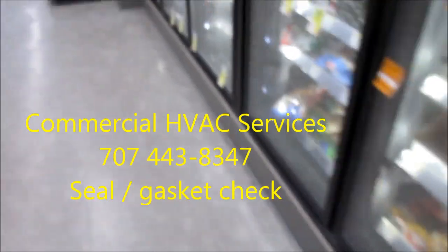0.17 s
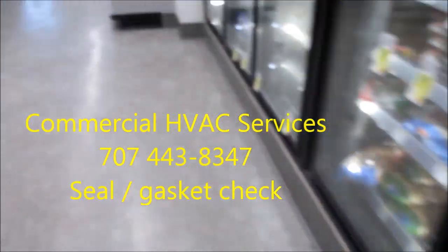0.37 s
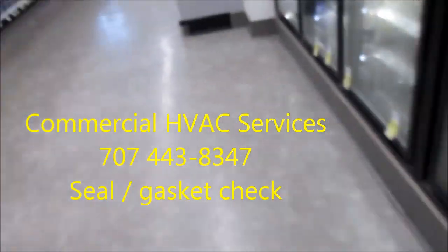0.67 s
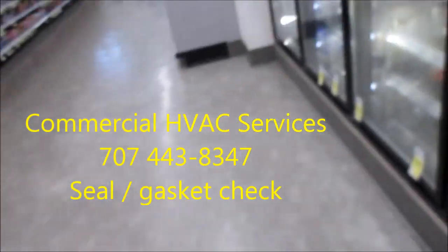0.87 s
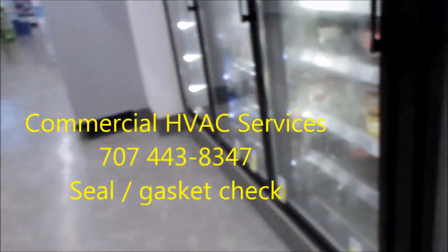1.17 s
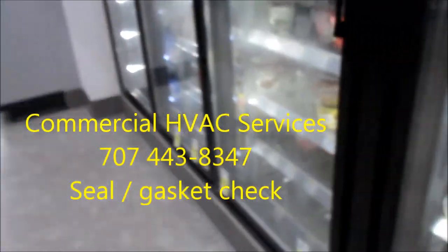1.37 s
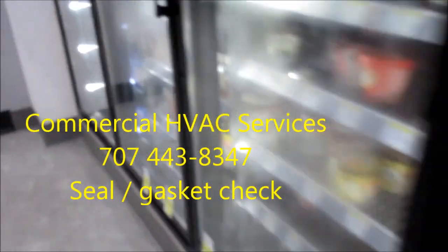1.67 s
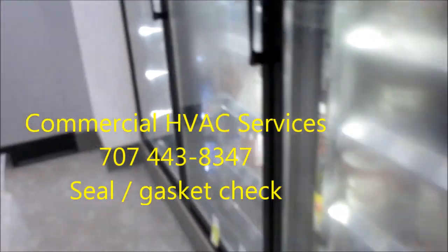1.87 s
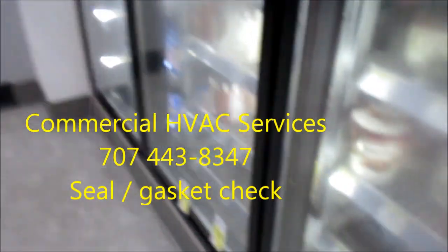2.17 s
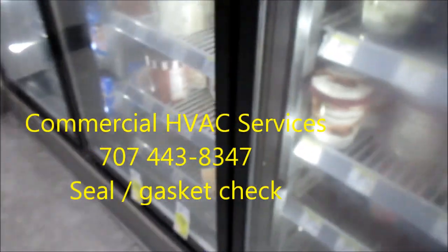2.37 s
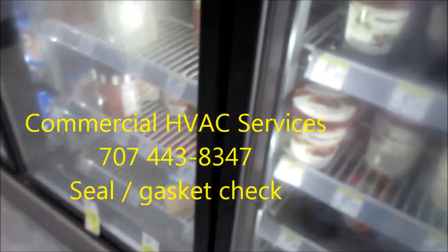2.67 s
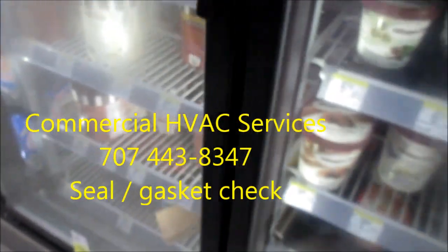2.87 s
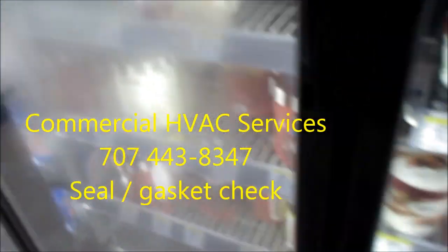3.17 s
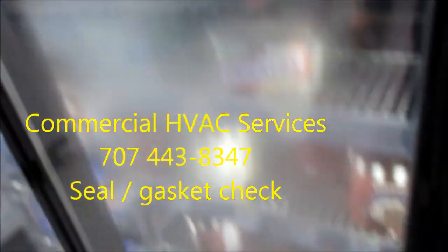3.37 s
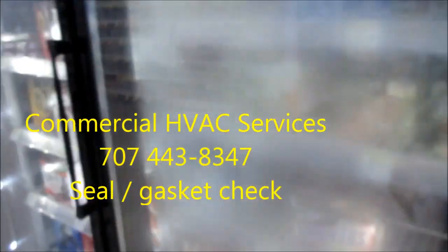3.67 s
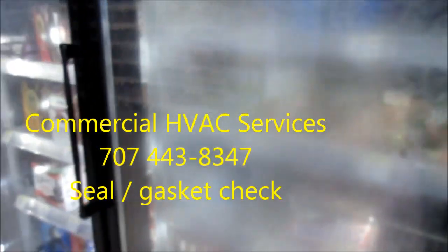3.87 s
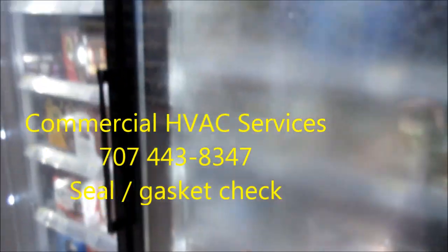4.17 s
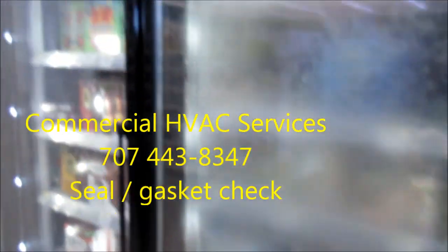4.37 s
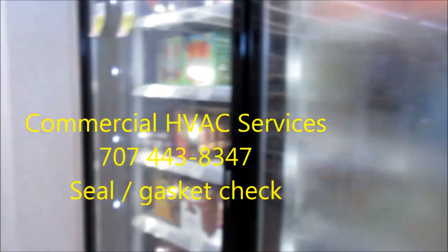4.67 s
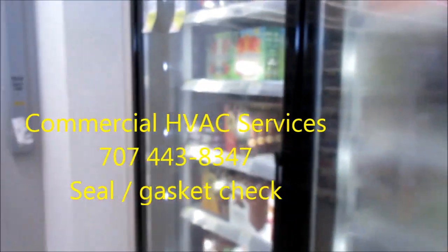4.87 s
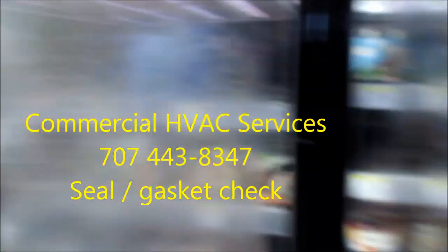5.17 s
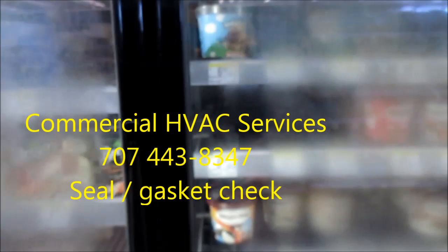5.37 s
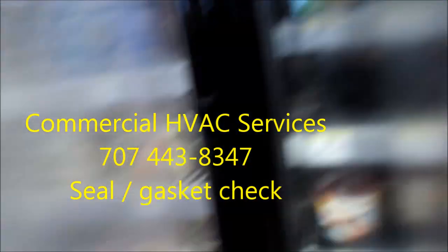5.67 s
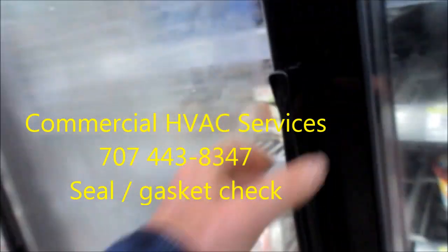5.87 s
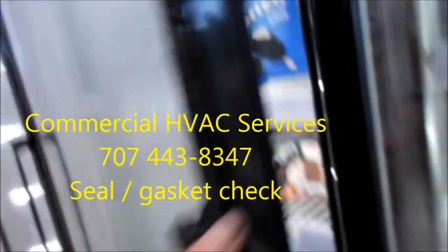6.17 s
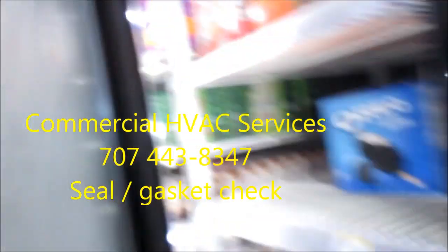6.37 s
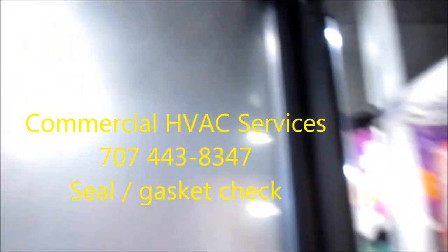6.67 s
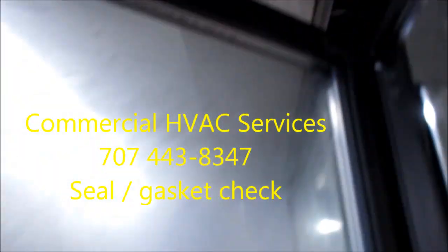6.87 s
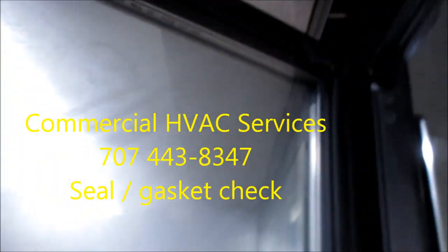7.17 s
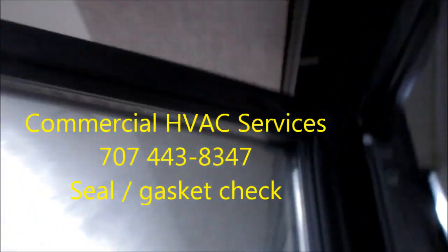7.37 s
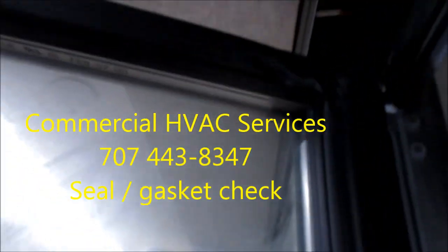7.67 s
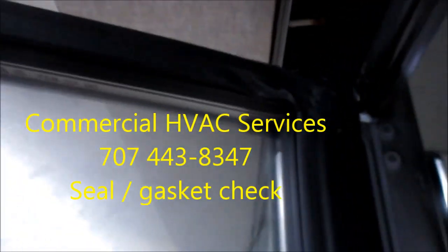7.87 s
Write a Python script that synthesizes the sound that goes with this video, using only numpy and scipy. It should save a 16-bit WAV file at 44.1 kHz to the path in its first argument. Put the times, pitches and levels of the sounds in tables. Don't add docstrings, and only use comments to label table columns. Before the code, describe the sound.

Silence for the first 0.24 s, then the shop background starts abruptly: distant low rumble, airy duct noise, thin cloth hiss and a low compressor hum, with fan tones near 130 Hz dipping as door frames pass. Handling noise sits very close: soft sleeve rubs from 0.3 s, a tap at 0.7, then a dense run of ticks, finger slips and hollow plastic knocks from 1.16 to 1.7 s, the hardest at 1.4. More knocks come at 2.0 to 2.3, a bright cloth swipe with taps around 2.6, and taps at 3.05 and 3.26. From 3.4 to 5.5 s it is mostly wavering hum and duct air, with faint taps. Taps return at 5.6, sharp ticks at 6.05. At 6.12 s a deep air puff marks the door opening; by 6.3 s loud fans and roaring air take over, beating several times a second until about 8 s, with a weak air nudge at 7.9.

```python
import sys
import numpy as np
from scipy import signal
from scipy.fft import rfft, irfft, next_fast_len
from scipy.io import wavfile
from scipy.ndimage import uniform_filter1d, map_coordinates

SR = 44100
rng = np.random.default_rng(int(sys.argv[2]) if len(sys.argv) > 2 else 0)


def transcribe(u):
    v = np.clip(np.atleast_2d(u).T, -1, 1)
    q = np.round(v * 32767).astype(np.int16)
    wavfile.write(sys.argv[1], SR, q)


def voltage_ratio(level):
    return 10 ** (np.asarray(level, float) / 20)


N = 354123


def unit(x):
    return x / np.sqrt(np.mean(x ** 2) + 1e-20)


def along(points, hz):
    point_hz, values = np.transpose(points)
    return np.interp(np.log(hz + 1), np.log(point_hz + 1), values)


def curves(rows, before=None, after=None):
    times, *columns = np.transpose(rows)
    return [np.interp(np.arange(N) / SR, times, column, before, after) for column in columns]


def wobble(rate):
    knots = rng.standard_normal(int(N * rate / SR) + 4)
    return map_coordinates(knots, [np.arange(N) * rate / SR])


def ramp(start, lasts):
    return np.clip((np.arange(N) / SR - start) / lasts, 0, 1)


def bump(center, half_width):
    return np.exp(-((np.arange(N) / SR - center) / half_width) ** 2)


def filtered(x, response):
    m = next_fast_len(len(x) + 8192)
    return irfft(rfft(x, m) * response(np.fft.rfftfreq(m, 1 / SR)), m)[:len(x)]


def lift(resonances, f):
    return voltage_ratio(sum(db / (1 + (2 * (f - hz) / width) ** 2) for hz, width, db in resonances))


def rush(spectrum, patchy_db, resonances=()):
    z = signal.stft(rng.standard_normal(N), nperseg=512)[2]
    field = uniform_filter1d(rng.standard_normal(z.shape), size=6, axis=0)
    field = uniform_filter1d(field, size=12, axis=1)
    noise = signal.istft(z * voltage_ratio(patchy_db * unit(field)), nperseg=512)[1][:N]
    return unit(filtered(noise, lambda f: voltage_ratio(along(spectrum, f)) * lift(resonances, f)))


# time_s, rumble_db
PLANT_LEVEL = [(.3, -34), (1.23, -29.5), (1.61, -37), (2.23, -34), (2.5, -40), (2.88, -34.5), (4.14, -31.5),
               (4.97, -40), (5.2, -33), (5.6, -30), (6.3, -36), (6.55, -41), (7.11, -42), (7.54, -33),
               (8.03, -38)]
# time_s, level_db
DUCT_NEARNESS = [(.3, -2), (.8, -0.5), (1.3, -1.5), (1.77, -3.5), (2.2, -0.5), (3.0, 0), (3.25, -0.5),
                 (3.63, 0.5), (3.9, 0), (4.45, -1), (5.3, -.5), (5.45, -1), (5.95, -0.5), (6.05, 4)]
# time_s, level_db
CLOTH_MOTION = [(.3, 1), (.9, 3), (1.1, 1), (1.55, -1.5), (1.72, 2), (2.3, 2), (2.47, -0.5), (3.3, 1),
                (4.1, -1.5), (4.85, 2.5), (5.25, 1), (5.4, -3.5), (5.68, 1), (5.9, -2)]
# pitch_hz, density_db (per Hz)
RUMBLE_SPECTRUM = [(8.8, -41), (15, -8), (38, 4), (63, 0.5), (76, -2), (92, -16), (104, 7), (110, -7),
                   (140, -53), (240, -120)]
DUCT_SPECTRUM = [(47, -47), (80, -13), (92, -3.5), (108, -8), (130, -3), (156, -9.5), (208, -6.5),
                 (257, -8), (387, -10.5), (418, -14), (689, -22), (1410, -25), (1560, -29), (1760, -35.5),
                 (3000, -49), (3900, -64), (6600, -120)]
HISS_SPECTRUM = [(1060, -23), (1800, -2.5), (2040, -6), (2530, -6), (2790, -6), (4240, -11.5),
                 (9640, -19.5), (14700, -33), (15200, -30)]
# pitch_hz, width_hz, boost_db
AISLE_MODES = [(29, 2.8, 2), (68.3, 3.7, 14), (171, 8.9, 5), (196, 47, -4.5), (289.3, 25, 3),
               (383.5, 11, 4), (697, 113, 4.5), (1170, 113, 3.5), (1584, 74, 9)]


def shop():
    rumble_db, = curves(PLANT_LEVEL)
    near_db, = curves(DUCT_NEARNESS)
    brisk_db, = curves(CLOTH_MOTION)
    rumble = voltage_ratio(rumble_db + 1.15 * wobble(11)) * rush(RUMBLE_SPECTRUM, 0.29, AISLE_MODES)
    duct = voltage_ratio(-28.5 + near_db + 1.1 * wobble(8)) * rush(DUCT_SPECTRUM, 1.13, AISLE_MODES)
    hiss = voltage_ratio(-50 + brisk_db + 0.7 * wobble(15)) * rush(HISS_SPECTRUM, 1.7)
    return rumble + duct + hiss


HUM_PITCHES = (28.7, 59.2)
# time_s, shaft_db, mains_db
HUM_LEVELS = [(.4, -51, -35.5), (1.4, -51, -33), (1.7, -38, -40), (2.3, -35, -30), (2.56, -42, -37),
              (2.8, -33, -29.5), (3.3, -33, -33), (3.7, -42, -33), (4.33, -33, -42), (5.1, -35, -32),
              (5.4, -33, -40), (6.2, -38, -36)]
# pitch_hz, first_db, last_db
CLOSED_FANS = [
    (131.7, -34.5, -49),
    (126.9, -34, -28.5),
]
# center_s, half_width_s, level_db
FRAME_SHADOWS = [(.63, 0.15, -12), (1.2, 0.056, -22), (1.56, 0.044, -15), (2.52, 0.023, -14),
                 (2.66, .1, -4.5), (3.32, 0.03, -14), (4.32, 0.042, -16), (4.6, 0.24, -5.5),
                 (5.04, 0.04, -2), (5.8, 0.052, -1.5)]


def compressors():
    t = np.arange(N) / SR

    def tone(hz, db, drift):
        level = voltage_ratio(db + 0.87 * wobble(11))
        return level * np.sqrt(2) * np.sin(2 * np.pi * hz * t + drift * wobble(7))

    levels = curves(HUM_LEVELS, after=-60)
    hum = sum(tone(hz, db, 0.009 * hz) for hz, db in zip(HUM_PITCHES, levels))
    shade_db = sum(db * bump(center, half_width) for center, half_width, db in FRAME_SHADOWS)
    shade_db = shade_db - 40 * ramp(6.15, 0.1)
    passed = ramp(2.3, 1.1)
    fans = sum(tone(hz, first_db + (last_db - first_db) * passed + shade_db, 0.87)
               for hz, first_db, last_db in CLOSED_FANS)
    return hum + fans


# pitch_hz, width_hz, boost_db
DUCT_MODES = [(240, 14, 17.5), (258.1, 17, 27), (296, 22, 25)]


def grilles():
    near_db, = curves(DUCT_NEARNESS[:-1], after=-20)
    level = voltage_ratio(-38 + 2.2 * near_db + 5.8 * ramp(1.8, 1.4) + wobble(6))
    return level * rush([(150, -40), (230, -3.5), (310, -0.5), (450, -42)], 0.6, DUCT_MODES)


# start_s, length_s, level_db, pitch_hz
CLOTH_RUBS = [(.269, 0.13, -46, 3980), (0.538, 0.049, -46.5, 5000), (0.578, 0.048, -39.5, 6200),
              (0.916, 0.031, -42.5, 6400), (1.0, 0.035, -56, 5000), (1.803, 0.058, -48, 5000),
              (1.87, 0.029, -45, 3000), (1.913, .012, -50, 4600), (1.958, .031, -44.5, 6960),
              (2.011, 0.046, -41.5, 7500), (2.575, 0.035, -47, 6000), (2.615, 0.048, -30, 4070),
              (2.668, 0.057, -37.5, 5000), (2.735, 0.054, -43.5, 5460), (3.22, .05, -52, 5000),
              (3.296, 0.018, -47, 7000), (3.38, 0.058, -43.5, 5600), (3.659, .033, -51, 5000),
              (5.119, .04, -49, 4500), (5.532, 0.11, -49, 6000), (5.767, 0.043, -51.5, 6000)]
# start_s, length_s, level_db, pitch_hz, body_db (below 3 kHz)
FINGER_SLIPS = [(0.713, 0.039, -38.5, 9000, 0), (1.19, 0.023, -43, 6000, 9),
                (1.297, 0.053, -40.5, 9000, -1), (1.329, 0.014, -34.5, 8650, 7),
                (1.401, 0.022, -31, 6160, 10), (1.473, 0.016, -36, 6000, 10.5),
                (1.532, 0.011, -36.5, 6050, 5), (1.647, 0.024, -37, 6030, 5), (3.031, 0.021, -35, 10500, 1),
                (3.047, 0.021, -39.5, 7000, 2), (5.607, 0.034, -42.5, 12500, 9),
                (6.035, 0.024, -37.5, 8300, 3.5), (6.057, .028, -37.5, 8950, 6),
                (6.109, .017, -39, 5000, -4), (6.33, .02, -36, 6000, -1)]
# pitch_hz, width_hz, boost_db
HOUSING_MODES = [(6200, 430, -2), (8600, 880, 0), (12500, 1400, 3.5), (3320, 690, 6)]


def scuffs():
    out, t = np.zeros(N + SR), np.arange(SR // 5) / SR
    # body_db (rubs only), fall_db, release t60 over the length
    rows = [row + (-1.5, -3, 2) for row in CLOTH_RUBS] + [row + (-6.5, 0.25) for row in FINGER_SLIPS]
    for start, length, db, hz, body_db, fall_db, tail in rows:
        bright_noise, body_noise, grit = rng.standard_normal((3, len(t)))

        def bright_gain(f):
            edges = 1 / (1 + (2600 / (f + 1)) ** 2) / (1 + f / (0.28 * hz)) / (1 + (f / 14000) ** 6)
            return edges * lift(HOUSING_MODES + [(hz, 0.22 * hz, 9)], f)

        def body_gain(f):
            edges = f / (f + 400) / (1 + (f / 2900) ** 12)
            return edges * lift([(2750, 210, 3.5), (1380, 3000, 6.3)], f)

        bright = unit(filtered(bright_noise, bright_gain))
        body = voltage_ratio(body_db) * unit(filtered(body_noise, body_gain))
        struck = min(abs(tick[0] - start) for tick in CLICKS) < 0.004
        rise = np.clip(t / (0.001 if struck else 0.2 * length), 0, 1)
        fade = voltage_ratio(-60 * np.clip(t - length, 0, 1) / (0.012 + tail * length))
        stick_slip = unit(voltage_ratio(1.3 * unit(uniform_filter1d(grit, size=120))))
        level = voltage_ratio(np.interp(t, [0, length], [db, db + fall_db]))
        out[round(start * SR):][:len(t)] += level * rise * fade * stick_slip * (bright + body)
    return out[:N]


# start_s, peak_db, pitch_hz
CLICKS = [(.514, -33, 5690), (.85, -22.5, 4140), (.9138, -33, 3060), (1.164, -22, 4250), (1.295, -23, 4200),
          (1.3514, -34, 6000), (1.403, -27, 3010), (1.4364, -37, 4730), (1.4725, -33, 3450),
          (1.529, -27, 6020), (1.6457, -35, 6080), (1.8108, -35, 3490), (2.0113, -40, 3890),
          (2.2666, -24.5, 3410), (2.524, -29, 7000), (3.265, -23, 3600), (5.6064, -39, 3100),
          (5.6574, -41, 3250), (6.0494, -16, 6960), (6.105, -28, 4140)]


def ticks():
    out, t = np.zeros(N + SR), np.arange(SR // 20) / SR
    for start, db, hz in CLICKS:
        def gain(f):
            bell = 1 / (1 + ((f - hz) / (0.5 * hz)) ** 2)
            return bell + 0.1 * (f > hz) / (1 + (f / 11000) ** 4)

        crack = unit(filtered(rng.standard_normal(len(t)), gain))
        out[round(start * SR):][:len(t)] += voltage_ratio(db - 7.5 - 60 * t / 0.011) * crack
    return out[:N]


# start_s, peak_db, ring_hz, t60_s, shell_db
TAPS = [(0.724, -24, 2120, 0.017, -7), (1.163, -25, 660, 0.013, -1), (1.199, -20, 1220, 0.032, -21),
        (1.296, -19.5, 1000, 0.012, -9), (1.338, -17.5, 900, 0.024, -17), (1.4027, -2.5, 580, 0.012, -7),
        (1.473, -15, 587, 0.012, -20), (1.504, -19, 681, 0.016, -13), (1.529, -15, 624, 0.025, -16),
        (1.646, -18, 650, 0.026, -14), (1.713, -30, 657, 0.013, -7), (2.012, -13, 624, 0.0094, -22),
        (2.197, -18.5, 694, 0.023, -14), (2.266, -18.5, 656, 0.021, -22), (2.611, -20.5, 1130, 0.017, -22),
        (2.671, -15, 1070, 0.023, -9), (3.048, -19, 1485, 0.03, -19), (3.264, -19, 2010, 0.014, -14.5),
        (4.376, -38, 719, 0.0091, -10), (4.762, -26, 696, 0.013, -11), (5.590, -17.5, 1530, 0.018, -20),
        (5.607, -17.5, 800, 0.0084, -8), (6.511, -21, 684, 0.013, -11)]


def knocks():
    out, t = np.zeros(N + SR), np.arange(SR // 20) / SR
    shell_hz = 2440

    def note(hz):
        return np.sin(2 * np.pi * hz * t)

    for start, db, hz, t60, shell_db in TAPS:
        shell = note(shell_hz) - 1.6 * note(0.58 * shell_hz)
        ring = note(hz) + 0.76 * note(0.684 * hz) + voltage_ratio(shell_db) * shell
        noise = rng.standard_normal(len(t))
        crack = unit(filtered(noise, lambda f: f / (f + hz) / (1 + (f / 3000) ** 4)))
        attack_s = 0.003 if t60 > 0.025 else 0.00035
        envelope = voltage_ratio(db - 60 * t / t60) * (1 - np.exp(-t / attack_s))
        out[round(start * SR):][:len(t)] -= envelope * (ring + 0.066 * crack)
    return out[:N]


# time_s, level_db
CASE_NEARNESS = [(6.09, -10), (6.3, 0), (6.47, 0), (6.78, 3), (6.84, -1), (7.05, -0.5), (7.64, 0),
                 (7.76, -2), (8.0, 0)]
FAN_PITCHES = (120.1, 126.7, 133.3)
# facing_shelves_db, bent_down_db
FAN_LEVELS = [(-15.5, -18), (-24.5, -28), (-30, -17)]
# pitch_hz, density_db (per Hz)
STREAM_SPECTRUM = [(29, -56), (50, -40), (70, -19.5), (100, -17.5), (131, -1), (155, -13.5), (183, -12),
                   (311, -12), (425, -15), (1450, -30.5), (7810, -52), (10400, -55), (15700, -66.5)]
# pitch_hz, width_hz, boost_db
CABINET_MODES = [(154, 14, 5), (184, 12, -1), (239, 43, 4), (400, 5.5, 0.5), (918, 100, 4),
                 (2260, 1800, 4.5), (10500, 670, 4)]


def open_case():
    t = np.arange(N) / SR - 7.09
    near_db, = curves(CASE_NEARNESS, before=-60)
    bent = ramp(6.35, 0.45)

    def blade(hz):
        level = voltage_ratio(1.4 * wobble(16) + 1.2 * wobble(3.03))
        return level * np.sqrt(2) * np.cos(2 * np.pi * hz * t + 0.2 * wobble(5))

    fans = sum(voltage_ratio(up_db + (down_db - up_db) * bent) * blade(hz)
               for hz, (up_db, down_db) in zip(FAN_PITCHES, FAN_LEVELS))
    door_db = -12 * bump(6.285, 0.035) + 3.5 * bump(6.35, 0.03)
    tones = voltage_ratio(1.75 * np.minimum(near_db, 0) + door_db) * fans

    air = rush(STREAM_SPECTRUM, 1.0, CABINET_MODES)
    low = filtered(air, lambda f: 1 / (1 + (f / 700) ** 4))
    top = filtered(air, lambda f: 1 - 1 / (1 + (f / 2800) ** 4))
    swing_s, swing_wide_s, swing_db = 6.33, 0.24, 4.5
    roar = voltage_ratio(-19 + swing_db * bump(swing_s, swing_wide_s) + 0.36 * near_db) * unit(low)
    middle_db = -31.5 + 0.27 * swing_db * bump(swing_s - 0.1, swing_wide_s)
    middle = voltage_ratio(middle_db) * unit(air - low - top)
    hiss = voltage_ratio(-38.5) * unit(top)
    return tones + voltage_ratio(near_db) * (roar + middle + hiss)


# start_s, level_db, pitch_hz, t60_s
AIR_PUSHES = [
    (6.123, -1, 50, 0.077),
    (7.905, -14, 45, .08),
]


def puffs():
    out = np.zeros(N)
    for start, db, hz, t60 in AIR_PUSHES:
        age = np.clip(np.arange(N) / SR - start, 0, 1)
        out += voltage_ratio(db - 60 * age / t60) * (1 - np.exp(-age / 0.006)) * np.sin(2 * np.pi * hz * age)
    return out


def scene():
    background = shop() + compressors() + grilles()
    handling = scuffs() + ticks() + knocks()
    return (background + handling + open_case() + puffs())[None]


def band_limit(x):
    return signal.sosfilt(signal.butter(12, 16210, fs=SR, output="sos"), x)


# pitch_hz, density_db (per Hz)
MIC_NOISE = [(3000, -30), (6000, 0), (10000, -3), (15500, -9)]
# pitch_hz, level_db
CAMERA_WHINE = [(15735, -80)]
# rate_hz, peak_s
WHINE_THROB = (13.485, .516)


def record(dry):
    t = np.arange(N) / SR
    start_s, top_hz = 0.2395, 15790
    whine_hz, whine_db = CAMERA_WHINE[0]
    throb_hz, peak_s = WHINE_THROB

    def response(f):
        notch = 1 - 0.89 / (1 + ((f - whine_hz / 2) / 70) ** 2)
        return notch * np.where(f < top_hz, 1, 0.02)

    x = dry[0] + voltage_ratio(-67) * rush(MIC_NOISE, 0.3)
    x = filtered(x * np.clip((t - start_s) / 0.0015, 0, 1), response)
    throb = 1 + 0.7 * np.cos(2 * np.pi * throb_hz * (t - peak_s))
    x = x + voltage_ratio(whine_db + 3) * throb * np.sin(2 * np.pi * whine_hz * t)
    x = x / (1 + np.abs(x / 0.99) ** 8) ** (1 / 8)
    return band_limit((x * (t > start_s - 0.003))[None])


dry = scene()
out = record(dry)
transcribe(out)
```